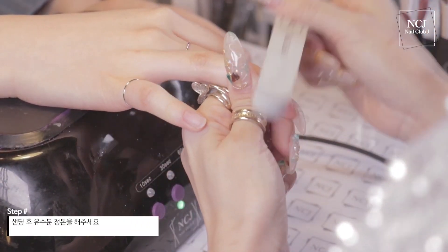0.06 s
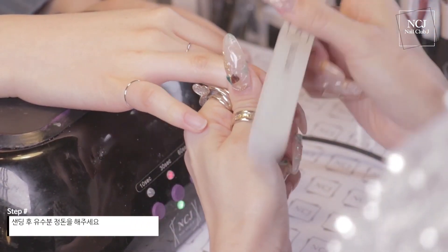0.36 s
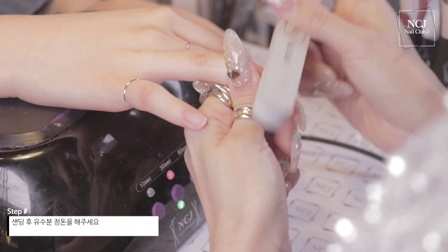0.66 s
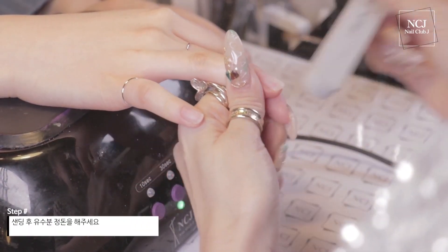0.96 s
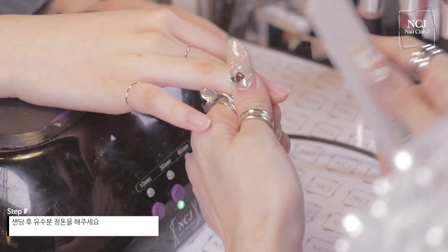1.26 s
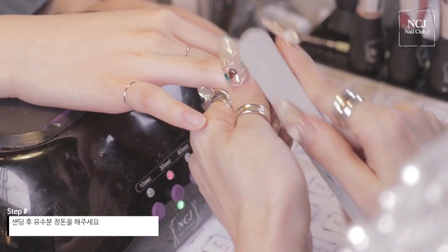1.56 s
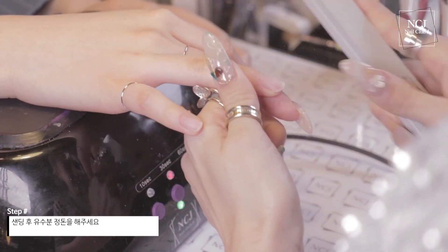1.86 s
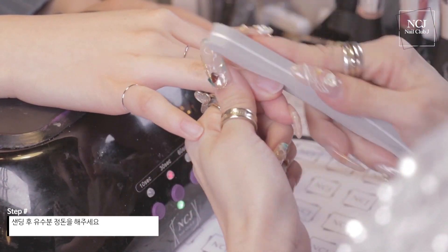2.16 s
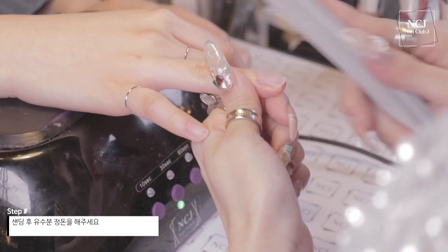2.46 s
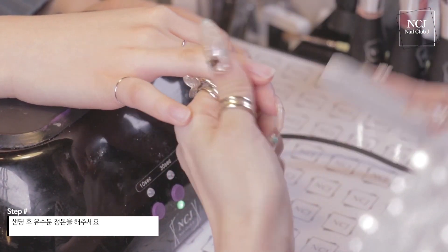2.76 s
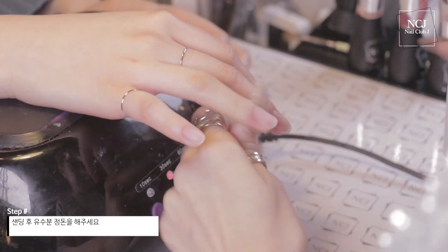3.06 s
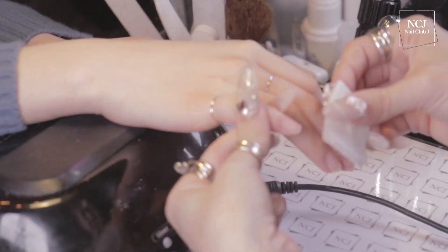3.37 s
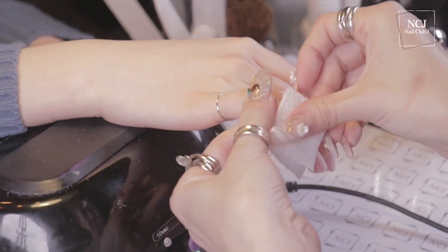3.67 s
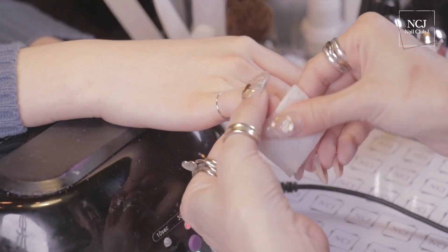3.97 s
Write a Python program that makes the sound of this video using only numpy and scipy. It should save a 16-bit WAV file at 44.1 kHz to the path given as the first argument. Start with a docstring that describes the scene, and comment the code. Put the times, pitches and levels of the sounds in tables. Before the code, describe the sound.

A hand file scrubs a fingernail in quick, raspy strokes, then slows to uneven sweeps with light clicks. Hands then knock and rub softly on a hollow rest as a wipe rustles, close up in a small room.

```python
"""Eleven quick, raspy scrubs of a hand file on a fingernail, close up in a small room, then slower slanted
sweeps. Grit catches the nail and rings the file, which taps on contact, chirps as it sticks and slips, and
grazes skin between strokes. The hands then shift on their hollow rest, which knocks and drones under the
sliding arm, while a wipe rustles against the nails. Low room rumble lies under it all."""
import sys
import numpy as np
from scipy import signal
from scipy.fft import rfft, irfft, next_fast_len
from scipy.io import wavfile
from scipy.ndimage import uniform_filter1d, map_coordinates

SR = 44100
rng = np.random.default_rng(int(sys.argv[2]) if len(sys.argv) > 2 else 0)


def master(y):
    """Save y as 16-bit WAV."""
    cut = np.clip(np.atleast_2d(y).T, -1, 1)
    pcm = np.round(cut * 32767)  # scale
    wavfile.write(sys.argv[1], SR, pcm.astype(np.int16))


N = 176400

# quick scrubs: t/s, length/s, rise/s, level/dB, brightness/(dB per octave)
SCRUB_STROKES = [(-.06, 0.095, .015, -14, 1), (.044, 0.098, 0.025, -13.5, -0.5),
                 (.15, 0.091, 0.017, -14.5, -1), (.249, 0.11, 0.021, -14, 0),
                 (.356, 0.095, 0.011, -15, 0.5), (.453, 0.095, 0.0068, -16, 0),
                 (.554, 0.098, 0.013, -15.5, 0.5), (.647, 0.1, 0.028, -15, -0.5),
                 (.761, 0.086, 0.011, -15.5, -0.5), (.848, 0.092, 0.013, -16.5, 0),
                 (.952, .14, .012, -14.5, 0)]
# broad tone of the scrubbing rasp: f/Hz, level/dB
SCRUB_EQ = [(200, -40), (700, -19.5), (1000, -22), (1400, -17), (2300, -18), (3300, -9.5), (6000, -2),
            (9000, -1), (12300, 1), (14000, -3.5), (15700, -8)]
# the file's resonances: f/Hz, width/Hz, boost when scrubbing/dB, boost when slanted/dB
FILE_RESONANCES = [(2786, 470, 7, 14), (3720, 146, 7.5, 8.5), (4450, 260, 5, 2), (5180, 220, -2.5, 2.5),
                   (5905, 220, 5, 2.5), (6270, 240, -3, 3.5), (6720, 280, 6.5, 0.5), (7020, 260, 2.5, 4.5),
                   (8180, 380, 3.5, 2.5), (9370, 260, 1, 0.5), (10000, 380, -3.5, -1), (10400, 360, 3, 0.5),
                   (11500, 250, 1, -1), (12800, 220, 3, 2)]
# tone of the room's rumble and hiss: f/Hz, level/dB
ROOM_TONE_EQ = [(15, -5), (28, -4), (36, 4), (48, 5.5), (62, -8), (100, -7), (150, -9.5), (200, -5.5),
                (260, -11), (450, -21.5), (720, -21.5), (1000, -29.5), (2200, -31.5), (7000, -38.5),
                (12000, -45.5), (16000, -52)]
# fader for the file grazing skin: t/s, level/dB
SKIN_FADER = [(0, -32), (1.05, -34), (1.22, -36.5), (1.29, -41.5), (1.45, -39), (1.49, -50.5), (1.563, -63),
              (1.575, -39), (1.62, -33), (1.83, -34), (2.04, -36.5), (2.16, -35), (2.21, -43), (2.46, -53),
              (2.52, -50), (2.63, -57), (2.85, -30.5), (2.88, -38.5), (3.02, -36.5), (3.13, -37.5),
              (3.18, -45), (3.3, -60)]
# taps of file and nails: t/s, level/dB, brightness/(dB per octave), t60/s, file ring/(0-1)
NAIL_TAPS = [(0.0462, -13, -1.5, 0.015, 0.8), (0.144, -13, 5, 0.014, .6), (0.2482, -21, -4, .012, .6),
             (0.254, -7, 8, .008, .6), (.4455, -17, 3, .012, 0.5), (0.4545, -9, 5, .01, 0.5),
             (.649, -11, 9, 0.013, .6), (0.851, -14, 6, .01, .6), (1.5669, -1.5, -5, 0.011, 0.6),
             (1.5705, -17.5, -4, .008, .2), (1.7936, -8, -3.5, 0.012, 0.9), (2.549, -28, 5, 0.023, 0.5),
             (2.6538, -22.5, 2, 0.027, .8), (2.968, -19, 3.5, 0.019, 0.85), (3.519, -23, -6, 0.018, 0.5),
             (3.762, -26.5, -4, .02, .5), (3.794, -26, 1, 0.029, 0.4), (3.937, -27, -5, 0.023, 0.6),
             (3.9549, -9.5, 1, 0.018, 0.5), (3.958, -5, 4, 0.011, 0.4)]
# tone of a tap: f/Hz, level/dB
TAP_EQ = [(200, -11), (700, -18.5), (1400, -11.5), (2200, -8), (3600, 1.5), (6000, 5), (10000, 4),
          (12500, 5.5), (14000, -6), (16000, -20)]
# the file catching the nail's edge: t/s, length/s, level/dB, f/Hz, half-width/Hz
EDGE_CATCHES = [(0.561, 0.02, -17.5, 7600, 3000), (2.42, 0.019, -24, 4550, 1600),
                (2.793, .012, -25, 4300, 2000), (2.8133, 0.0065, -15, 5250, 2900),
                (2.828, 0.0094, -17.5, 5400, 1800)]
# slanted sweeps: t/s, length/s, rise/s, fall/s, level/dB, brightness/(dB per octave),
# boost of the file's lowest resonance/dB, nail body/dB
SWEEP_STROKES = [(1.09, 0.085, 0.044, 0.0094, -26, 2, -3, 3), (1.306, 0.094, .005, 0.031, -26, 2, -6, 3.5),
                 (1.385, 0.076, 0.044, .03, -29.5, 7.5, 6, 7),
                 (1.605, 0.21, 0.1, 0.018, -20.5, -0.5, -11, 4),
                 (1.783, 0.023, 0.0091, .012, -12.5, -2.5, -11, -10),
                 (1.83, 0.08, 0.058, 0.025, -28, 2, -5, 11.5), (1.885, 0.11, 0.039, 0.015, -24, 2, 4.5, 3),
                 (2.058, 0.057, 0.047, 0.022, -21.5, 2, -7, 11),
                 (2.1, 0.053, 0.029, 0.029, -22, 8.5, -9, 21),
                 (2.213, 0.034, .015, .015, -32.5, -0.5, -3, 0),
                 (2.24, 0.11, .05, 0.048, -28, -6.5, 1, -16), (2.278, 0.2, 0.052, .06, -16, 0, 1, -1.5),
                 (2.674, .178, 0.052, 0.034, -15, -1, 2.5, -5),
                 (2.897, 0.069, 0.019, 0.034, -23.5, 3, -1, 5),
                 (3.04, 0.094, 0.073, 0.029, -23.5, 0.5, -3.5, 2.5)]
# broad tone of the slanted rasp: f/Hz, level/dB
SWEEP_EQ = [(200, -41), (700, -21.5), (1000, -25), (1350, -16.5), (2200, -20), (3200, -13.5), (6300, -2.5),
            (8800, -3), (12300, -1.5), (14000, -8.5), (15700, -13)]
# hands and rings knocking the rest: t/s, level/dB, thud t60/s, ringing/dB, its tilt/(dB per octave)
REST_KNOCKS = [(1.7929, -28, 0.032, -3, 4), (3.238, -34, .06, -3, 0), (3.247, -26, 0.099, -4, -12),
               (3.2575, -24.5, 0.036, -6, 3), (3.273, -29.5, .05, -5, -13), (3.519, -23.5, 0.044, -0.5, 3)]
# tone of a knock's thud: f/Hz, level/dB
THUD_EQ = [(100, -2), (330, 5.5), (600, -4), (1600, -6), (3000, -8), (5000, -15), (12000, -15),
           (16000, -43)]
# modes of the knocked rest: f/Hz, level/dB, t60/s
REST_MODES = [(330, -6.5, 0.097), (580, -9, 0.13), (698, -3, 0.072), (772, -10, .08), (1086, -11.5, .07),
              (1590, -19, .06)]
# fader for the arm's dull rubbing: t/s, level/dB
RUB_FADER = [(3.17, -43), (3.25, -29), (3.3, -27.5), (3.4, -32), (3.6, -31), (3.87, -30.5), (4, -30.5)]
# tone of that rubbing: f/Hz, level/dB
RUB_EQ = [(30, 3), (100, -0.5), (190, 3.5), (300, -9), (450, -20), (700, -17.5), (1200, -29), (3000, -56)]
# fader for the rest's drone: t/s, level/dB
DRONE_FADER = [(3.22, -50), (3.25, -25), (3.28, -26), (3.31, -46), (3.36, -28.5), (3.42, -58), (3.44, -24),
               (3.51, -30.5), (3.66, -22.5), (3.78, -27.5), (3.87, -35), (3.94, -30), (4, -36)]
# fader for the wipe's rustle: t/s, level/dB
WIPE_FADER = [(3.18, -56), (3.25, -37.5), (3.34, -37), (3.42, -41), (3.56, -40.5), (3.65, -44), (3.73, -37),
              (3.8, -34), (3.83, -42.5), (3.87, -35), (3.91, -45.5), (3.98, -36.5)]
# tone of that rustle: f/Hz, level/dB
WIPE_EQ = [(500, -3.5), (2100, -10), (3000, -9), (4900, -9), (5600, -1), (7500, -3.5), (9200, -1),
           (12300, 0), (15500, -6)]

# the band where the grit sings: f/Hz at full speed, width as a share of f, boost/dB
SCRUB_SONG, SWEEP_SONG = (14000, 0.98, 0.93), (7900, 0.55, 2.96)
ECHO_NEAR_S, ECHO_FAR_S, ECHO_GAIN = 0.001086, 0.0019, 0.3  # the wave returning from the file's end


def amp(db):
    """Decibels to gain."""
    return 10 ** (np.asarray(db) / 20)


def unit(x):
    """Scaled to rms 1."""
    return x / np.sqrt(np.mean(x ** 2) + 1e-20)


def eq(points, hz):
    """An EQ curve in dB, drawn through points on a log frequency axis."""
    f, db = np.transpose(points)
    return np.interp(np.log(hz + 1), np.log(f + 1), db)


def fader(points):
    """Gain per sample, shut until the first point."""
    s, db = np.transpose(points)
    return amp(np.interp(np.arange(N) / SR, s, db, left=-120))


def wobble(per_s, n):
    """A smooth random curve with per_s knots a second."""
    return map_coordinates(rng.standard_normal(4000), [np.arange(n) * per_s / SR], mode="wrap")


def coloured(x, db_of_hz):
    """x through a minimum-phase filter with the given dB response."""
    m = 2 * next_fast_len(len(x) // 2 + 2048)
    cepstrum = irfft(np.log(amp(db_of_hz(np.fft.rfftfreq(m, 1 / SR))) + 1e-6), m)
    cepstrum[1:m // 2] *= 2
    cepstrum[m // 2 + 1:] = 0
    return irfft(rfft(x, m) * np.exp(rfft(cepstrum)), m)[:len(x)]


def noise(n, colour):
    """Coloured noise at rms 1."""
    return unit(coloured(rng.standard_normal(n), colour))


def add(out, s, x):
    """Mixes x into out at time s."""
    i = round(s * SR)
    x = x[max(-i, 0):len(out) - i]
    out[max(i, 0):max(i, 0) + len(x)] += x


def bell(hz, centre, width):
    """A bell curve peaking at 1."""
    return np.exp(-2 * ((hz - centre) / width) ** 2)


def tilt(hz, slope):
    """A treble slope in dB per octave, pivoting at 7 kHz."""
    return slope * np.log2(np.maximum(hz, 1500) / 7000)


def swell(t, length):
    """A rounded rise and fall."""
    return np.sin(np.pi * np.clip(t / length, 0, 1))


def file_ring(hz, slanted, grip_db=1.2):
    """The file's resonances in dB; each grip damps them a little differently."""
    offsets = grip_db * rng.standard_normal(len(FILE_RESONANCES))
    return sum(((sweep if slanted else scrub) + offset) * bell(hz, f, width)
               for (f, width, scrub, sweep), offset in zip(FILE_RESONANCES, offsets))


def grit(n, per_s, spread_db, share):
    """Tiny uneven impacts carry a share of the power; fine hiss is the remainder."""
    hits = rng.random(n) < per_s / SR
    sizes = amp(spread_db * np.minimum(rng.standard_normal(n), 2.5))
    impacts = unit(hits * sizes * rng.choice([-1, 1], n))
    return np.sqrt(share) * impacts + np.sqrt(1 - share) * rng.standard_normal(n)


def stroke(length, rise, fall, colour, song, outward, chatter_db=0.18, patchy_db=2.1):
    """Grit rasps the nail as the contact travels along the file and pressure rises and falls."""
    n = SR // 4
    t = np.arange(n) / SR
    rasp = grit(n, per_s=9000, spread_db=4.5, share=0.56) * amp(chatter_db * wobble(260, n))
    travel = np.clip(t / length, 0, 1)
    delay = ECHO_NEAR_S + (ECHO_FAR_S - ECHO_NEAR_S) * (travel if outward else 1 - travel)
    rasp = rasp + ECHO_GAIN * map_coordinates(rasp, [(t - delay) * SR])
    hz, frame_s, spectra = signal.stft(rasp, SR, nperseg=256)
    speed = np.sin(np.pi * np.clip(frame_s / length, 0.05, 0.95)) ** 0.58
    song_hz, width, boost_db = song
    singing = boost_db * bell(hz[:, None], song_hz * speed, width * song_hz * speed)  # faster is higher
    dulling = tilt(hz[:, None], 0.5 * (speed - 1))  # slower is duller
    patches = uniform_filter1d(rng.standard_normal(spectra.shape), size=4, axis=0)
    patches = unit(uniform_filter1d(patches, size=6, axis=1))  # the tone flickers
    spectra *= amp(singing + dulling + patchy_db * patches)
    rasp = coloured(signal.istft(spectra, nperseg=256)[1][:n], colour)
    press = np.sin(np.pi / 2 * np.clip(t / rise, 0, 1)) ** 1.13
    release = np.clip((length - t) / fall, 0, 1) ** 1.36
    return rasp / np.std(rasp[t < length]) * press * release


def scrubbing(fall_s=0.029, sag_db_per_s=44):
    """Quick strokes to and fro, each easing off as it runs."""
    out = np.zeros(N)
    for k, (s, length, rise, db, bright) in enumerate(SCRUB_STROKES):
        colour = lambda hz: eq(SCRUB_EQ, hz) + file_ring(hz, slanted=False) + tilt(hz, bright)
        rasp = stroke(length, rise, fall_s, colour, SCRUB_SONG, outward=k % 2)
        add(out, s, rasp * amp(db - sag_db_per_s * np.arange(len(rasp)) / SR))
    return out


def room_tone(db=-33.5):
    """A steady bed of low rumble and faint hiss."""
    return amp(db) * noise(N, lambda hz: eq(ROOM_TONE_EQ, hz))


def room_reverb(x, t60=0.17, wet_db=-12.5):
    """Adds a faint, short answer from the table and walls."""
    t = np.arange(SR // 3) / SR
    tail = rng.standard_normal(len(t)) * amp(-60 * t / t60) * (t > 0.003)
    return x + amp(wet_db) * signal.fftconvolve(x, tail / np.linalg.norm(tail))[:N]


def skin_graze(flutter_db=1.25):
    """The file brushes skin: a soft, grainy whisper between strokes."""
    colour = lambda hz: (eq(SWEEP_EQ, hz) + 0.86 * file_ring(hz, slanted=True, grip_db=0)
                         + tilt(hz, 0.54))
    whisper = unit(coloured(grit(N, per_s=3000, spread_db=8.7, share=0.5), colour))
    return whisper * fader(SKIN_FADER) * amp(flutter_db * wobble(70, N))


def taps(attack_s=0.00031):
    """Hard contacts of file and nails: crisp clicks coloured by the file's ring."""
    out = np.zeros(N)
    t = np.arange(SR // 6) / SR
    attack = 1 - np.exp(-t / attack_s)
    for s, db, bright, t60, ring in NAIL_TAPS:
        colour = lambda hz: (eq(TAP_EQ, hz) + ring * file_ring(hz, slanted=True, grip_db=0)
                             + tilt(hz, bright))
        add(out, s, noise(len(t), colour) * attack * amp(db - 60 * t / t60))
    return out


def catches(peak_db=30):
    """Brief chirps where the file sticks and slips on the nail's edge."""
    out = np.zeros(N)
    t = np.arange(SR // 8) / SR
    for s, length, db, pitch, half_width in EDGE_CATCHES:
        colour = lambda hz: (peak_db * bell(hz, pitch, 2 * half_width)
                             + file_ring(hz, slanted=True, grip_db=0))
        add(out, s, amp(db) * noise(len(t), colour) * swell(t, length))
    return out


def sweeping(nail_hz=1500, nail_width_hz=2700):
    """Single passes with the file slanted along the nail's side."""
    out = np.zeros(N)
    low_hz, low_width = FILE_RESONANCES[0][:2]
    for k, (s, length, rise, fall, db, bright, low_db, body_db) in enumerate(SWEEP_STROKES):
        colour = lambda hz: (eq(SWEEP_EQ, hz) + file_ring(hz, slanted=True) + tilt(hz, bright)
                             + low_db * bell(hz, low_hz, low_width)
                             + body_db * bell(hz, nail_hz, nail_width_hz))
        add(out, s, amp(db) * stroke(length, rise, fall, colour, SWEEP_SONG, outward=k % 2))
    return out


def fingertip_bump(start_s=1.6, length_s=0.052, hz=125, db=-29):
    """A fingertip presses on the table: one dull, low bump."""
    out = np.zeros(N)
    t = np.arange(SR // 8) / SR
    add(out, start_s, amp(db) * swell(t, length_s) * np.sin(2 * np.pi * hz * t))
    return out


def knocks():
    """Hands and rings thud softly on the hollow rest and set its modes ringing."""
    out = np.zeros(N)
    t = np.arange(SR // 6) / SR
    for s, db, t60, ring_db, slope in REST_KNOCKS:
        thud = noise(len(t), lambda hz: eq(THUD_EQ, hz)) * amp(-60 * t / t60)
        ring = sum(amp(mode_db + slope * np.log2(f / 700) - 60 * t / life) * np.sin(2 * np.pi * f * t)
                   for f, mode_db, life in REST_MODES)
        add(out, s, amp(db) * (thud + amp(ring_db) * ring))
    return out


def arm_slide(drone_hz=198, wander_hz=1.9, flutter_db=1):
    """The sliding arm rubs the hollow rest and keeps its lowest mode droning."""
    pitch = drone_hz + wander_hz * wobble(25, N)
    drone = unit(np.sin(2 * np.pi * np.cumsum(pitch) / SR) * amp(flutter_db * wobble(45, N)))
    rub = noise(N, lambda hz: eq(RUB_EQ, hz))
    return fader(DRONE_FADER) * drone + fader(RUB_FADER) * rub


def wipe(flutter_db=1):
    """A soft wipe rustles against the nails: light crackle over hiss."""
    crackle = grit(N, per_s=700, spread_db=7.5, share=0.36)
    rustle = unit(coloured(crackle, lambda hz: eq(WIPE_EQ, hz)))
    return rustle * fader(WIPE_FADER) * amp(flutter_db * wobble(54, N))


def scene():
    """Mono mix: nail work with a touch of reverb, dry handling sounds, room tone beneath."""
    bed = room_tone()
    nail_work = scrubbing() + sweeping() + catches() + taps() + skin_graze() + wipe()
    handling = fingertip_bump() + knocks() + arm_slide()
    return (room_reverb(nail_work) + handling + bed)[None]


def record(dry, top_hz=15780):
    """Clips peaks at full scale, then cuts everything above top_hz."""
    m = next_fast_len(N + SR // 4)
    passband = np.fft.rfftfreq(m, 1 / SR) < top_hz
    return irfft(rfft(np.clip(dry, -1, 1), m) * passband, m)[..., :N]


dry = scene()
out = record(dry)
master(out)
```